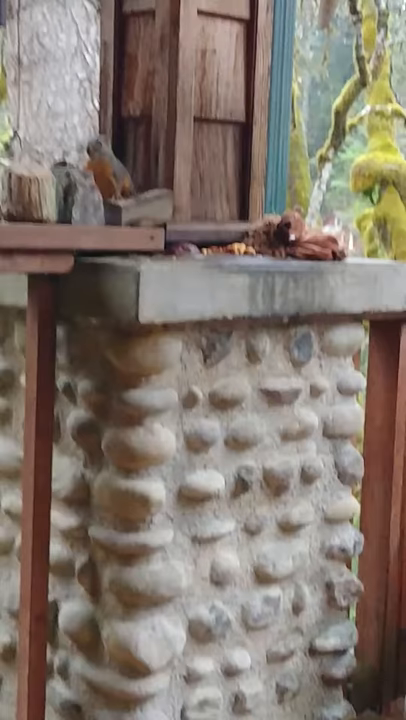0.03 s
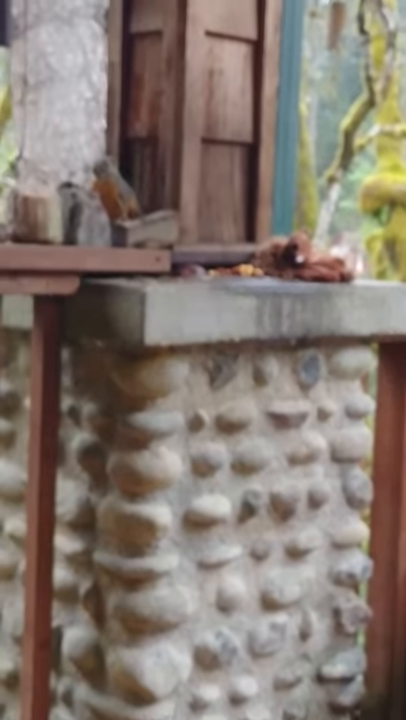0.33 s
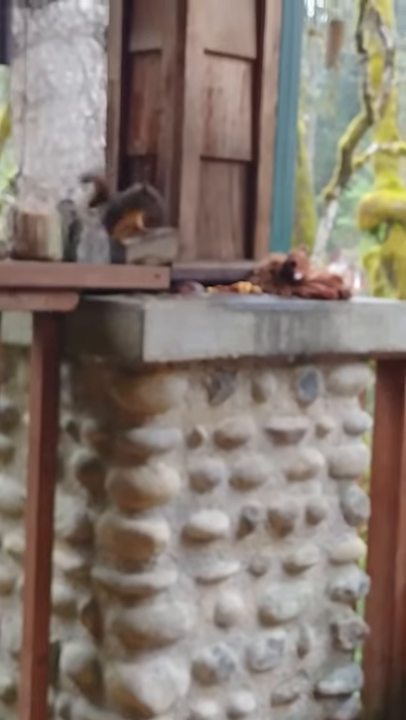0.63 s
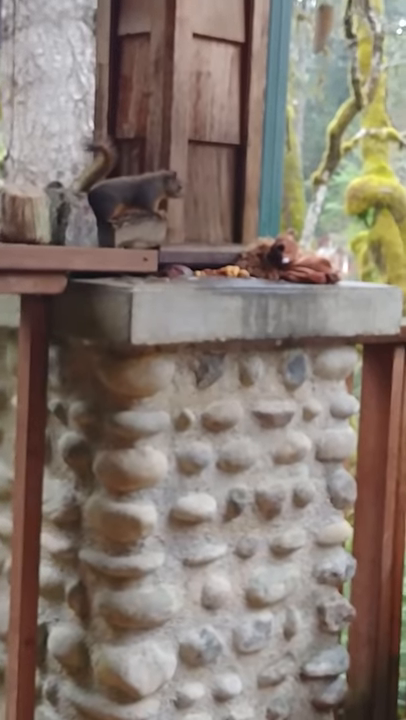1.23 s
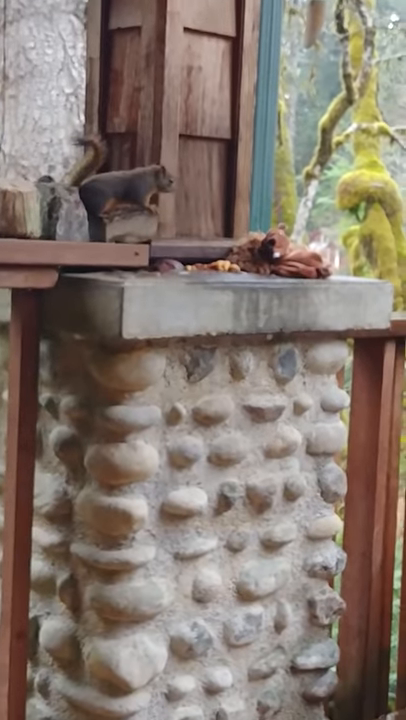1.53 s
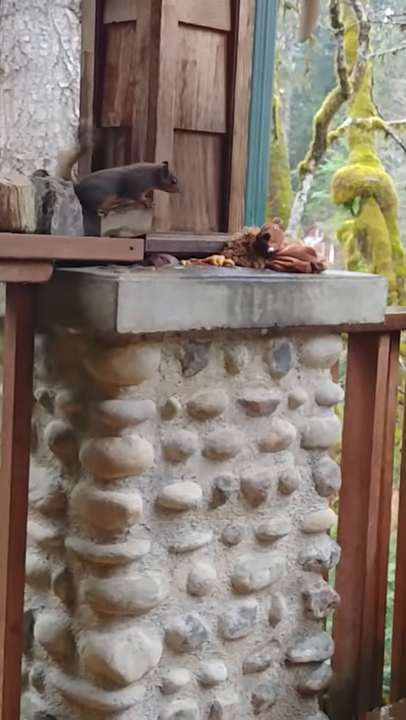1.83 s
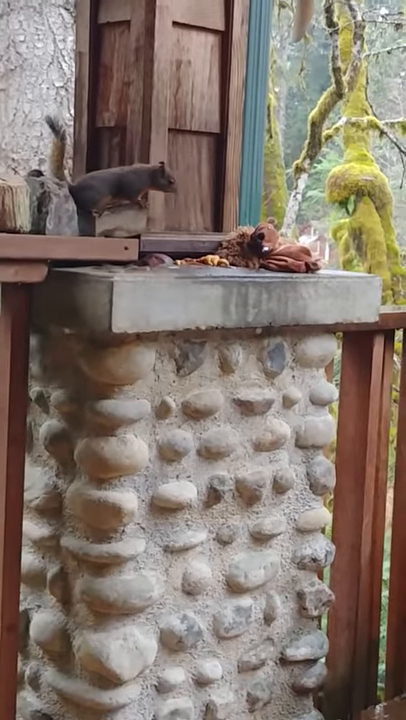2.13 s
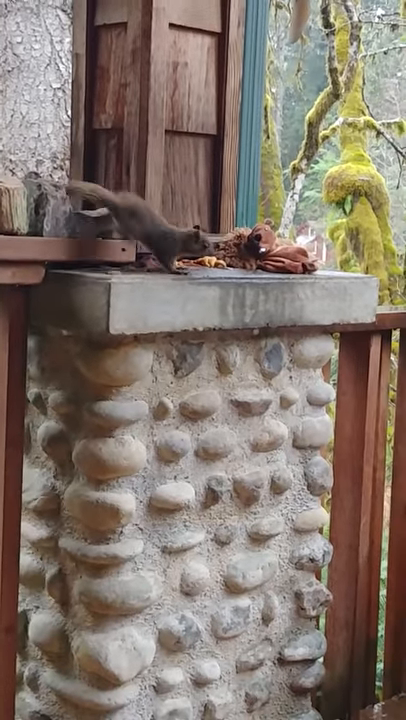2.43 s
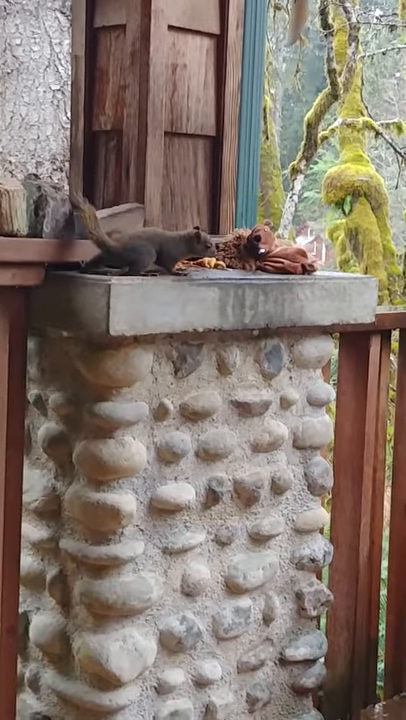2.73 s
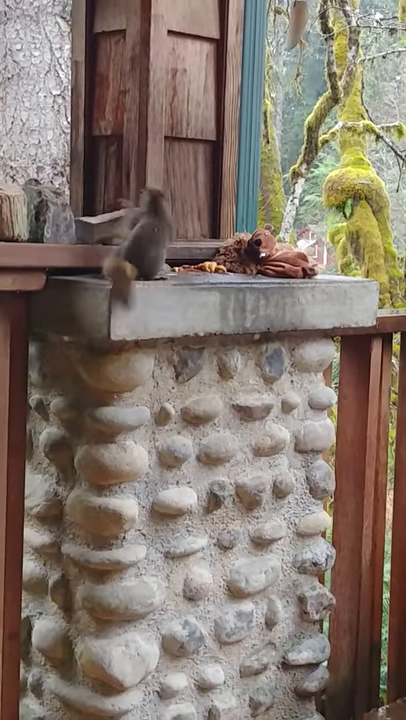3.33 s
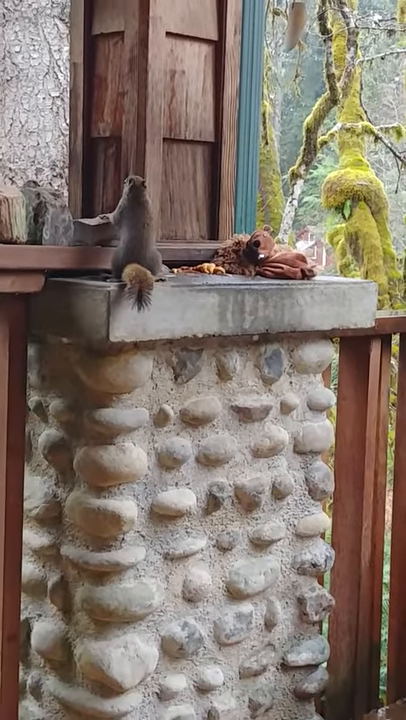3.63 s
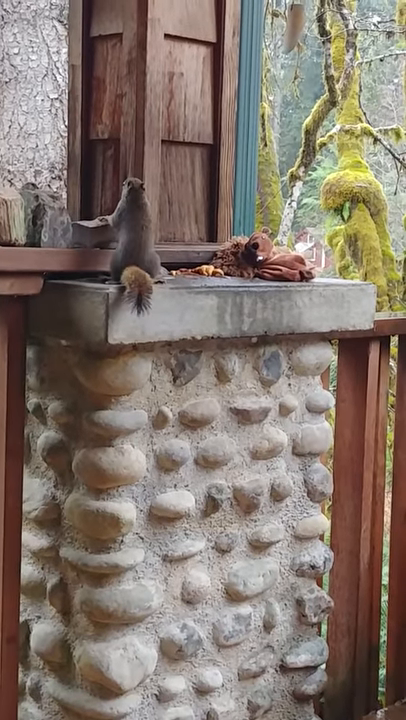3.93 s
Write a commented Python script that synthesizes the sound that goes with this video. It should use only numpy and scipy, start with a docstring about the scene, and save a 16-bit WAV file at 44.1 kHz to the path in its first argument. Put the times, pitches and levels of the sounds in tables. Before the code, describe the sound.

A forest creek rushes steadily, heard from a wooden porch. Faint high twitters, perhaps distant birds, come and go, while a squirrel makes a few soft scuffs and light claw ticks on wood.

```python
"""A forest creek, heard in stereo from a wooden porch whose hollows colour the noise.
Out of silence the rush opens, treble first and bass last, with a narrow high sizzle above it.
Faint twittering swells, perhaps far birds, come and go, and low swells, perhaps the water gulping.
Near one second come soft scuffs, probably a squirrel's feet; from 1.6 s its claws tick on wood.
The twittering grows busier, and one more scuff and tick follow near 3.5 s as the creek runs on."""
import sys
import numpy as np
from scipy import signal
from scipy.fft import rfft, irfft
from scipy.io import wavfile

SR = 44100
rng = np.random.default_rng(int(sys.argv[2]) if len(sys.argv) > 2 else 0)


def dump(signal):
    """Clip the signal to [-1, 1] and save it as 16-bit WAV at the path in sys.argv[1]."""
    limited = np.clip(np.atleast_2d(signal).T, -1, 1)
    pcm = np.round(limited * 32767).astype(np.int16)
    wavfile.write(sys.argv[1], SR, pcm)


N = 176400
T = np.arange(N) / SR
HZ = np.maximum(np.arange(N // 2 + 1) * SR / N, 1)
SIDES = np.array([[1], [-1]])  # left, right; every pan is left minus right

# how alike the water sounds at the two microphones: f/Hz, correlation
WATER_LIKENESS = [(60, 0.92), (270, 1), (480, 0.9), (600, 0.59), (800, 0.42), (1080, 0.93), (1420, 0),
                  (1800, 0.35), (2400, 0.44), (3000, 0.24), (4000, 0.41), (5000, 0), (15000, 0.021)]


def from_db(db):
    """Decibels to gain."""
    return 10 ** (np.asarray(db) / 20)


def rms_one(x):
    """Scale to rms 1."""
    return x / np.sqrt(np.mean(x ** 2) + 1e-20)


def in_time(points):
    """Join (t/s, value) points by straight lines."""
    return np.interp(T, *np.transpose(points))


def over_hz(points):
    """Join (f/Hz, value) points on a log-frequency axis."""
    hz, value = np.transpose(points)
    return np.interp(np.log(HZ), np.log(hz), value)


def drift(rate_hz):
    """Random wander of rms 1, mostly slower than rate_hz."""
    return rms_one(irfft(rfft(rng.standard_normal(N)) / (1 + (HZ / rate_hz) ** 2), N))


def stereo_noise(gain, pan_db, alike, lead=0):
    """Noise at two microphones with a given colour, balance, correlation and phase lead; rms 1."""
    mid, side = rfft(rng.standard_normal((2, N)))
    alike = np.clip(alike, -.99, .99)
    pair = np.sqrt(1 + alike) * mid + SIDES * np.sqrt(1 - alike) * side
    placement = from_db(SIDES * pan_db / 2) * np.exp(.5j * SIDES * lead)
    return rms_one(irfft(pair * gain * placement, N))


def band(hz, width_hz, order):
    """Gain of a resonance; a higher order has steeper flanks."""
    return 1 / np.sqrt(1 + ((HZ ** 2 - hz ** 2) / (HZ * width_hz)) ** (2 * order))


def swell(middle_s, length_s):
    """A bell-shaped rise and fall."""
    return np.exp(-2 * ((T - middle_s) / length_s) ** 2)


def porch_walls():
    """Weak early reflections ripple the spectrum above the bass, differently at each microphone."""
    count, echo_db, above_hz = 10, -10.5, 370
    delays_s = rng.uniform(.005, .03, (count, 2, 1))
    echoes = sum(np.exp(-2j * np.pi * HZ * delay) for delay in delays_s) / np.sqrt(count)
    return 1 + from_db(echo_db) * echoes * HZ / (HZ + above_hz)


def porch_hollows():
    """The wooden hollows resonate in narrow bands of the water's noise."""
    # resonances: f/Hz, width/Hz, level/dB, pan/dB, correlation
    hollows = [(81.8, 16, -56, 2, 0.99), (109, 11, -62.5, 1, 1), (158.7, 8.8, -51, 2, 0.97),
               (264.5, 27, -52, 0, 1), (329.8, 30, -51.5, 0, 1), (451, 19, -60.5, -3, 0.72),
               (632, 27, -58.5, -2, 0.79), (873, 45, -55.5, 4, 0.46), (1110, 89, -56, -3, .9),
               (1612, 30, -52.5, -3.5, 0.11), (2392, 25, -60, -1, 0.87), (2750, 22, -71, 4, .5),
               (3116, 44, -60.5, -5, 0.076), (3350, 130, -63.5, -7, 0.22), (3980, 220, -63.5, 6, 0.23)]
    return sum(from_db(db) * stereo_noise(band(hz, width, order=2), pan, alike)
               for hz, width, db, pan, alike in hollows)


def creek():
    """Rushing water heard from the porch; each half octave flickers, and the bass opens last."""
    # spectrum of the rush: f/Hz, relative level/dB
    colour = [(28, -34), (36, -30), (48, -10), (66, -5), (105, -5), (135, -8.5), (190, -2), (300, -1.5),
              (400, -5), (490, -1), (570, -6), (850, -3.5), (1120, -4), (1400, -7), (1750, -6), (2200, -8),
              (2650, -11), (3200, -10), (3700, -14.5), (4450, -18), (4800, -17), (5500, -18.5),
              (6300, -18.5), (6750, -24.5), (8800, -29), (9500, -26.5), (10400, -61.5), (11600, -35.5),
              (15300, -33.5)]
    # where the rush lies: f/Hz, pan/dB
    pan = [(60, 2.5), (160, -0.3), (300, -0.6), (500, -0.5), (800, 2.5), (1300, 1.3), (1750, -6.5),
           (2450, -1), (3200, -4.5), (3900, -2.5), (4700, 2), (5800, -2.5), (7000, -3.5), (14000, 1)]
    # lead at the left microphone: f/Hz, phase/rad
    lead = [(70, 0.56), (330, -0.72), (450, 0.4), (620, .5), (1050, 0), (1350, 1.2), (1750, 0.06),
            (2100, 0.85), (2500, 0.33), (3100, 2.5), (4000, 3.5)]
    # the rush grows slowly and unevenly: t/s, level/dB
    flow = [(.6, -1.5), (1.4, -1.5), (2.0, 0.1), (2.8, -1), (3.2, 0.2), (4.0, -0.5)]
    # the fade-in, scaled for each band by its depth: t/s, level/dB
    opening = [(.156, -21), (.19, -13), (.28, -10.5), (.34, -4), (.46, -1.6), (.58, 0.76)]
    # the right side grows as the listener turns: t/s, treble pan/dB
    turn = [(.2, 1.3), (1.3, 2), (2.1, 0.4), (4.0, 0.06)]
    water = stereo_noise(from_db(over_hz(colour)), over_hz(pan), over_hz(WATER_LIKENESS), over_hz(lead))
    rush = from_db(-38.5) * water + porch_hollows()
    spectrum = rfft(rush) * porch_walls()
    flow_db = in_time(flow) + 0.06 * drift(rate_hz=12)  # all bands surge very slightly together
    opening_db, turn_db = in_time(opening), SIDES * in_time(turn) / 2
    treble_hz, bass_hz, turn_above_hz = 4800, 110, 610
    centres_hz = 40 * 2 ** np.arange(0, 9, .5)
    out = 0
    for hz, pick in zip(centres_hz, np.eye(len(centres_hz))):
        half_octave = irfft(spectrum * np.interp(np.log(HZ), np.log(centres_hz), pick), N)
        depth = 0.18 + 0.82 / (1 + (hz / treble_hz) ** 2) + 0.96 / (1 + (hz / bass_hz) ** 2)
        side_db = turn_db * hz / (hz + turn_above_hz)
        flicker_db = 1.08 * drift(rate_hz=11.3)
        out = out + half_octave * from_db(flow_db + depth * opening_db + side_db + flicker_db)
    return out


def sizzle():
    """A narrow, flickering high band, mostly on the left."""
    # spectrum of the sizzle: f/Hz, relative level/dB
    colour = [(6500, -20), (7150, -12), (7550, 0), (7800, 0.5), (8320, -2.5), (8650, -12), (8850, -12),
              (9300, -28), (10000, -65)]
    # where it lies: f/Hz, pan/dB
    pan = [(7400, 1.4), (7800, 3.5), (8200, 6.7), (8700, 2.9)]
    # its slow rise and fall: t/s, level/dB
    loudness = [(.156, -59), (.2, -50), (.52, -47.5), (.7, -49.5), (1.3, -48.5), (1.55, -49.5), (1.7, -50),
                (1.95, -47.5), (2.3, -50.5), (3.0, -49), (3.5, -48.5), (4.0, -48.5)]
    level_db = in_time(loudness) + 1.22 * drift(rate_hz=14)
    return from_db(level_db) * stereo_noise(from_db(over_hz(colour)), over_hz(pan), alike=-0.097)


def twitters():
    """Thin high swells, perhaps birds, blurred by distance."""
    # swells: middle t/s, length/s, f/Hz, width/Hz, level/dB
    calls = [(.22, .12, 5800, 600, -64), (.84, 0.11, 5860, 700, -56.5), (1.551, .014, 5950, 450, -49.5),
             (1.57, .012, 6000, 400, -48.5), (1.657, 0.012, 5900, 1000, -46),
             (1.673, 0.035, 5500, 950, -45), (1.776, 0.11, 5650, 700, -55.5), (2.066, .09, 5600, 700, -52),
             (2.28, 0.29, 5820, 600, -53.5), (2.537, .07, 5940, 350, -56), (2.665, .07, 5930, 450, -52.5),
             (2.818, 0.046, 5550, 600, -53), (2.925, .07, 5700, 750, -52), (3.165, .055, 5540, 1160, -49.5),
             (3.26, 0.045, 5600, 600, -54.5), (3.342, .07, 5800, 600, -57), (3.48, 0.037, 5700, 800, -49),
             (3.53, .025, 5450, 600, -50), (3.597, 0.057, 5500, 650, -48), (3.638, .025, 5430, 600, -52),
             (3.896, 0.056, 6130, 600, -50.5)]
    out = 0
    for t, length, hz, width, db in calls:
        voice = stereo_noise(band(hz, width, order=3), pan_db=-0.5, alike=0.29)
        out = out + from_db(db) * swell(t, length) * voice
    roughness_db = 2.5 * drift(rate_hz=26)
    return out * from_db(roughness_db)


def gulps():
    """Brief low swells, perhaps the water gulping, each inside a broader wash."""
    # swells: middle t/s, f/Hz, level/dB
    low_swells = [(.672, 270, -43.5), (1.25, 175, -42), (1.935, 230, -46), (2.21, 215, -42),
                  (2.56, 265, -48), (3.045, 243, -45.5), (3.85, 267, -46)]
    alike = over_hz(WATER_LIKENESS)
    wash = from_db(-4) * stereo_noise(band(374, width_hz=1550, order=3), pan_db=0, alike=alike)
    out = 0
    for t, hz, db in low_swells:
        gulp = stereo_noise(band(hz, width_hz=270, order=2), pan_db=0, alike=alike)
        out = out + from_db(db) * (swell(t, length_s=0.05) * gulp + swell(t, length_s=0.12) * wash)
    return out


def scuffs():
    """Soft brief scrapes a little to the right, probably the squirrel's feet."""
    # scrapes: middle t/s, length/s, f/Hz, level/dB
    scrapes = [(0.896, 0.035, 1660, -42), (1.145, .07, 1850, -45.5), (3.41, 0.027, 4170, -53)]
    out = 0
    for t, length, hz, db in scrapes:
        friction = stereo_noise(band(hz, width_hz=1450, order=4), pan_db=-2, alike=0)
        out = out + from_db(db) * swell(t, length) * friction
    return out


def claws():
    """Claws on wood: one sharp tick and a few soft touches, each ringing on in a narrower band."""
    # claw strikes: t/s, ring level/dB, crack level/dB
    ticks = [(1.62, -37, -33), (1.681, -48, -60), (1.719, -51, -60), (1.936, -43, -60), (3.492, -46, -60)]
    # spectrum of a tick: f/Hz, relative level/dB
    tick_colour = [(3000, -20), (5500, -2), (7000, -3.5), (7800, 7), (8500, 2), (9400, -6), (10400, -31),
                   (12500, -15), (15500, -24)]
    attack_s, crack_t60_s, ring_t60_s = 0.00027, 0.023, 0.22
    crack, ring = 0, 0
    for t, ring_db, crack_db in ticks:
        age = np.maximum(T - t, 0)
        rise = 1 - np.exp(-age / attack_s)
        crack = crack + rise * from_db(crack_db - 60 * age / crack_t60_s)
        ring = ring + rise * from_db(ring_db - 60 * age / ring_t60_s)
    colour = from_db(over_hz(tick_colour))
    crack_noise = stereo_noise(colour, pan_db=1.5, alike=0.18)
    ring_noise = stereo_noise(colour * band(7670, width_hz=1400, order=1), pan_db=1.5, alike=0.18)
    return crack * crack_noise + ring * ring_noise


def scene():
    """Everything that reaches the microphones on the porch."""
    return creek() + gulps() + sizzle() + twitters() + claws() + scuffs()


def record(dry):
    """The microphones open after a moment of silence; the top is cut steeply."""
    start_s, fade_s, cutoff_hz = 0.152, 0.0049, 15800
    opened = dry * np.clip((T - start_s) / fade_s, 0, 1)
    lowpass = signal.ellip(12, .1, 70, cutoff_hz, fs=SR, output="sos")
    return signal.sosfilt(lowpass, opened)


dry = scene()
out = record(dry)
dump(out)
```